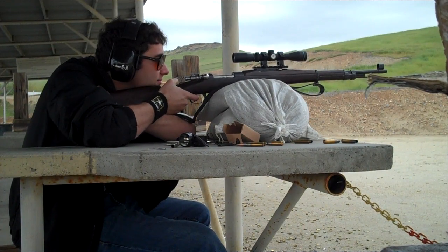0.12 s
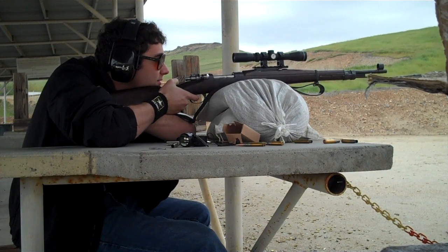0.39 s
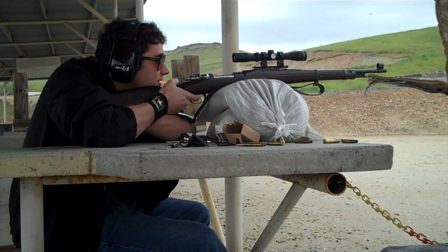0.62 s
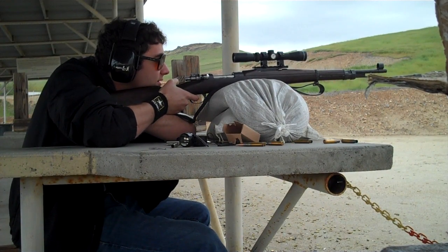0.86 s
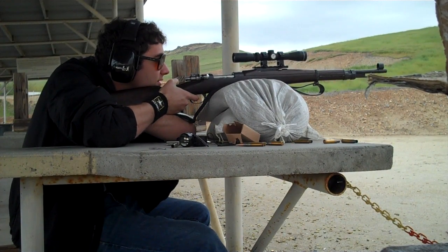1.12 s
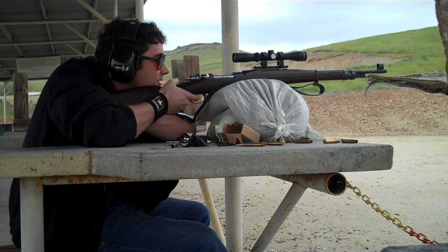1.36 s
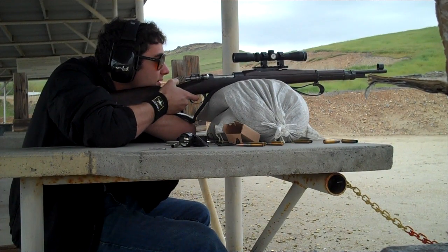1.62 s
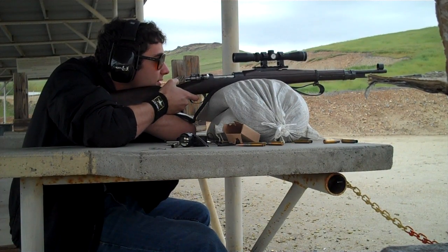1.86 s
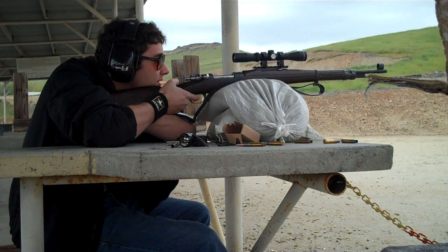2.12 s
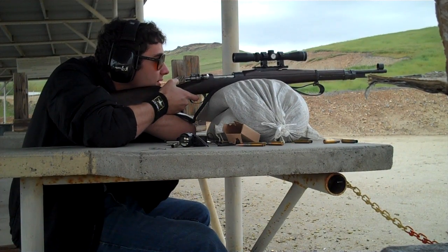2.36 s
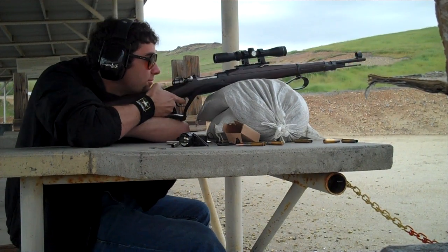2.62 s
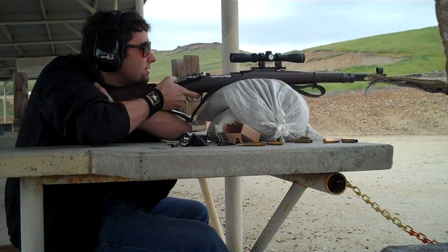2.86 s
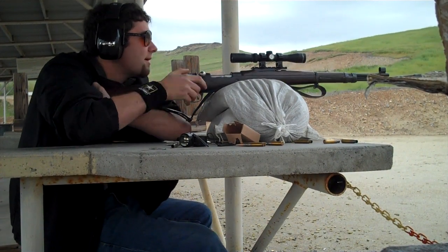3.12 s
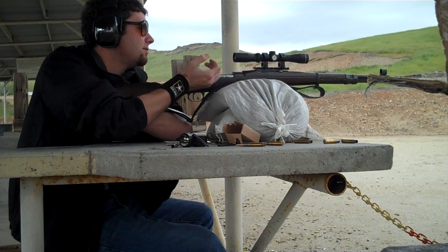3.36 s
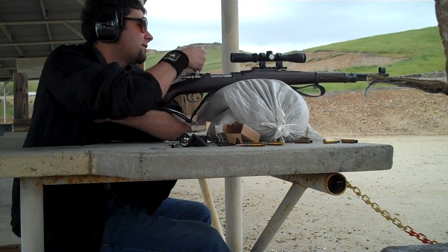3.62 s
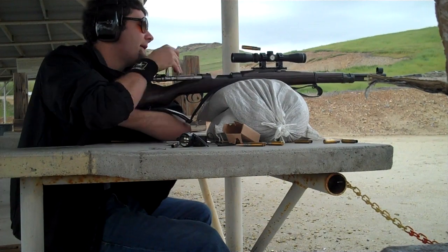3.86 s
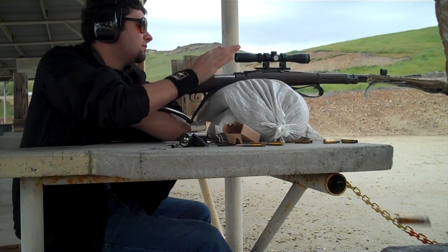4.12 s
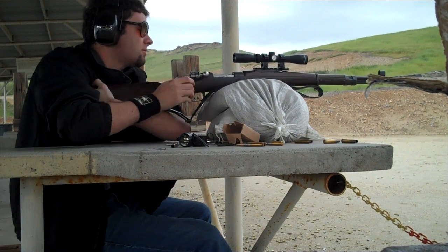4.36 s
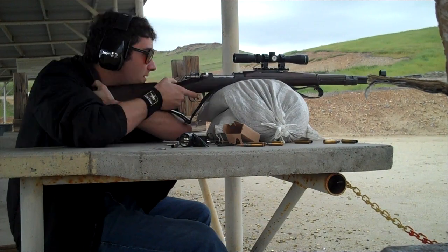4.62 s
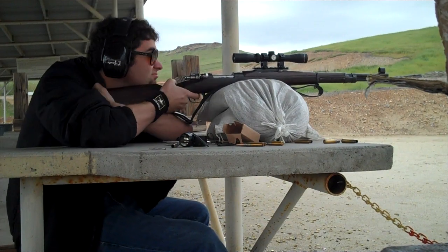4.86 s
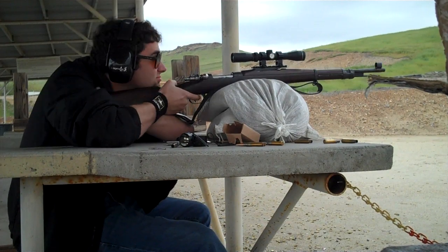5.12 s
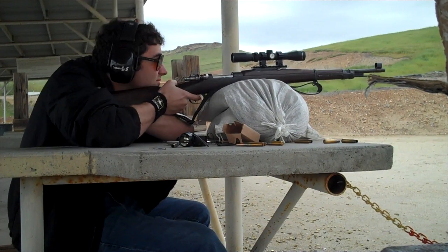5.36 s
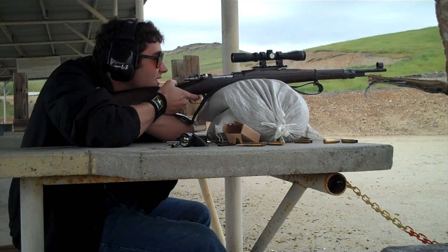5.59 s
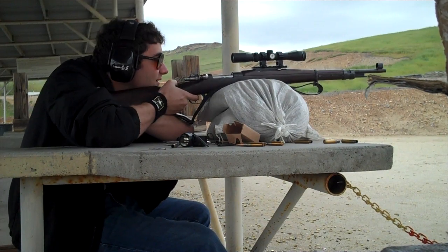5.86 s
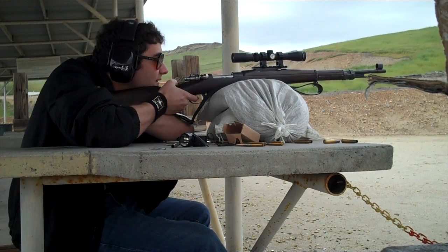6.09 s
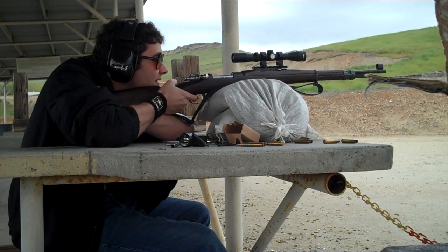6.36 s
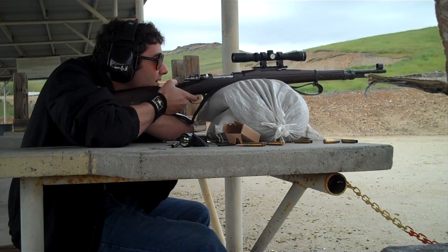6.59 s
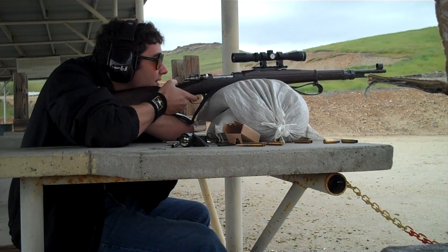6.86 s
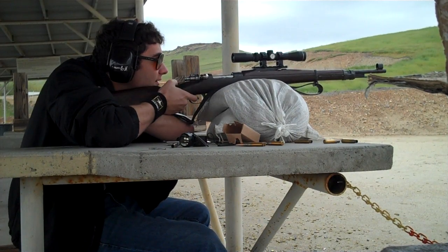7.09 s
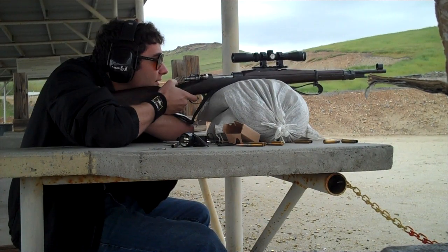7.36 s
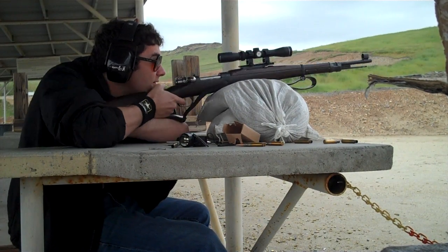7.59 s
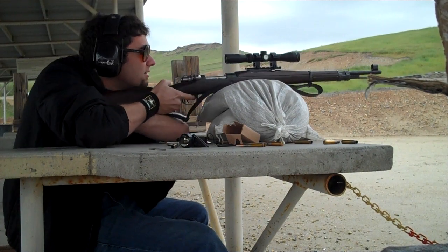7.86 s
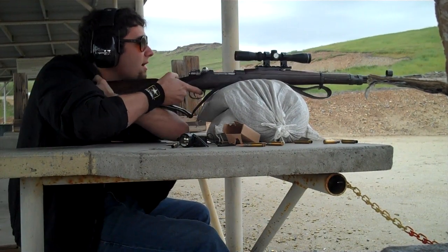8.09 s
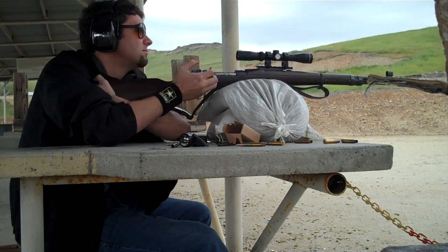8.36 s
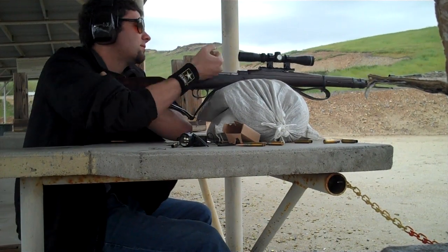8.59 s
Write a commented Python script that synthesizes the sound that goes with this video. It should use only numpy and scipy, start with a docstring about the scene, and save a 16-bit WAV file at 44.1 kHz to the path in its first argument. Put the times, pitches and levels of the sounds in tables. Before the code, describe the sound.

A rifle cracks and echoes off hills, its bolt rattles open and shut, an empty case tinkles away, then a second shot booms.

```python
"""Two rifle shots crack and boom under a sheet roof; berm, valley and hills answer in coloured noise and thuds.
Between them bursts of steel and wood noise work the bolt, and a brass case bounces with ringing twin modes.
Behind lie a noise wash, an engine's wavering partials, a pulsing thin tone and a bird's gliding whistles.
Two resonant microphone ports overload; gain control ducks all of it after loud sounds."""
import sys
import numpy as np
from scipy import signal
from scipy.io import wavfile
from scipy.ndimage import uniform_filter1d

SR = 44100
rng = np.random.default_rng(int(sys.argv[2]) if len(sys.argv) > 2 else 0)


def linear_from_db(decibels):
    """Turn decibels (scalar or array-like) into linear amplitude factors; 0 gives 1."""
    return 10 ** (np.asarray(decibels, float) / 20)


def wav_out(sig):
    """Save sig, one row per channel (or a flat mono array), as 16-bit PCM at SR to the path in sys.argv[1]."""
    wavfile.write(sys.argv[1], SR, np.round(np.clip(np.atleast_2d(sig).T, -1, 1) * 32767).astype(np.int16))


N = 384552  # samples in the scene


def read(points, hz, column=1):
    """Reads a table column at any frequency, interpolating along log frequency."""
    table = np.transpose(points)
    return np.interp(np.log(hz + 1), np.log(table[0] + 1), table[column])


def evened(x):
    """Scales a sound to rms 1."""
    return x / np.sqrt(np.mean(x ** 2) + 1e-20)


def add(mix, start_s, sound):
    """Lays a sound into the mix, cut off at the end."""
    part = mix[..., round(start_s * SR):][..., :sound.shape[-1]]
    part += sound[..., :part.shape[-1]]


def sides(lean_db):
    """Left and right gains whose levels differ by lean_db."""
    return linear_from_db(np.array([[.5], [-.5]]) * lean_db)


def noise(size, frame, same, magnitude):
    """Two partly alike channels of random short-time spectra; magnitude(hz, t) shapes them."""
    hop = frame // 4
    hz = np.fft.rfftfreq(frame, 1 / SR)[:, None]
    t = np.arange(size // hop + 5) * hop / SR
    a, b, c, d = rng.standard_normal((len(t), len(hz), 4)).T
    left, other = a + 1j * b, c + 1j * d
    like = np.clip(read(same, hz), -1, 1)
    right = like * left + np.sqrt(1 - like ** 2) * other
    spectra = np.array([left, right]) * magnitude(hz, t)
    return signal.istft(spectra, nperseg=frame, noverlap=frame - hop)[1][:, :size]


def coloured(size, frame, same, colour):
    """Steady noise of rms 1 with the spectrum of a colour table."""
    return evened(noise(size, frame, same, lambda hz, t: linear_from_db(read(colour, hz) + 0 * t)))


def wander(hz):
    """Slow irregular drift of rms 1: eight sines up to hz, the slow ones strongest."""
    t = np.arange(N) / SR
    rates = np.geomspace(0.11 * hz, hz, 8)
    return evened(sum(np.sin(2 * np.pi * (f * t + rng.random())) / np.sqrt(f) for f in rates))


# left-right likeness of close bursts, boom and replies: (frequency [Hz], correlation [-1..1])
BURST_LIKENESS = [(60, 0.2), (180, 0.27), (540, 0.3), (1610, 0.65), (4810, 0.11), (14400, 0.065)]


def knock(colour, decay_s, rise_s):
    """A burst of coloured noise, partly alike on both sides, that rises at once and dies exponentially."""
    t = np.arange(2048) / SR
    burst = coloured(len(t), 256, BURST_LIKENESS, colour)
    return burst * np.exp(-t / decay_s) * np.minimum(t / rise_s, 1)


# spectrum of the open range: (frequency [Hz], relative density [dB per Hz])
AIR_COLOUR = [(60, -11), (290, -8), (370, -7.5), (670, -16), (1400, -18), (1670, -26.5), (2340, -21.5),
              (2900, -29.5), (3500, -23.5), (4700, -30.5), (6200, -25), (7500, -30), (9000, -36.5),
              (11000, -45.5), (14200, -49.5), (15000, -79.5)]
# left-right likeness of the wash: (frequency [Hz], correlation [-1..1])
AIR_LIKENESS = [(60, 0.89), (150, 0.95), (370, 1), (930, 0.74), (2320, 0.94), (5780, -0.45), (14400, -0.24)]
# balance of the wash: (frequency [Hz], left over right [dB])
AIR_LEAN = [(60, 2.5), (240, 0.5), (930, 1), (3660, -0.5), (14400, 5)]


def air():
    """Wash of the open range: coloured noise with faint patches drifting over time and pitch."""
    def shape(hz, t):
        patches = rng.standard_normal((len(t), len(hz)))
        patches = uniform_filter1d(uniform_filter1d(patches, 12, 0), 10, 1).T
        lean_db = np.array([.5, -.5])[:, None, None] * read(AIR_LEAN, hz)
        return linear_from_db(read(AIR_COLOUR, hz) + 1.2 * evened(patches) + lean_db)
    return linear_from_db(-50) * evened(noise(N, 1024, AIR_LIKENESS, shape))


# partials of the engine: (frequency [Hz], level [dB rms])
ENGINE_PARTIALS = [(102.3, -63.5), (355.3, -54.5), (409.1, -56), (613.7, -66), (1314, -71)]


def engine():
    """Steady partials of a far engine; the wind makes their pitch and level waver."""
    warped_s = np.cumsum(1 + 0.0011 * wander(2.4)) / SR
    out = np.zeros((2, N))
    for hz, db in ENGINE_PARTIALS:
        level = np.sqrt(2) * linear_from_db(db + 0.97 * wander(3.1))
        out += level * np.sin(2 * np.pi * (hz * warped_s + rng.random()))
    return out


# pulses of the thin tone: one level [dB rms] each
WHINE_PULSES = [-66.5, -67, -70, -61]


def whine():
    """A thin 1527 Hz tone that pulses on and off a few times, its level trembling."""
    first_s, every_s, on_s, edge_s = 0.096, 0.688, 0.34, .04
    t = np.arange(N) / SR
    level = np.zeros(N)
    for k, db in enumerate(WHINE_PULSES):
        start = first_s + every_s * k
        inside_s = np.minimum(t - start, start + on_s - t)
        level += linear_from_db(db) * np.clip(inside_s / edge_s + .5, 0, 1)
    return np.sqrt(2) * level * linear_from_db(2 * wander(15.0)) * np.sin(2 * np.pi * 1527 * t)


# whistles: (middle time [s], start pitch [Hz], end pitch [Hz], length [s], level [dB])
BIRD_CHIRPS = [(1.39, 4100, 3700, .05, -61), (1.41, 4500, 4600, .06, -62), (1.526, 3440, 3810, .064, -59),
               (1.815, 4050, 3600, .045, -61), (1.85, 4500, 4620, .09, -65), (1.925, 4520, 4800, .06, -61),
               (2.03, 3400, 3450, .05, -59), (2.06, 3500, 3960, .06, -60), (2.145, 4000, 3650, .05, -61),
               (2.165, 4550, 4650, .05, -61)]


def bird():
    """Short slurred whistles, far off: gliding sines whose pitch flutters 70 times a second."""
    out = np.zeros(N)
    for middle_s, from_hz, to_hz, length_s, db in BIRD_CHIRPS:
        hz = np.linspace(from_hz, to_hz, round(length_s * SR))
        hz *= 1 + 0.042 * np.sin(2 * np.pi * 70 * np.arange(len(hz)) / SR)
        whistle = np.hanning(len(hz)) * np.sin(2 * np.pi * np.cumsum(hz) / SR)
        add(out, middle_s - length_s / 2, linear_from_db(db) * whistle)
    return out


# spectrum of the woody tap: (frequency [Hz], relative density [dB per Hz])
TAP_COLOUR = [(410, -45), (700, -13), (1480, -14.5), (2460, 2.5), (3350, -11.5), (3680, -14), (6500, -14),
              (8450, -48.5), (14300, -120)]


def tap():
    """A single dry knock on wood: one noise burst with a 2.5 ms decay."""
    out = np.zeros((2, N))
    add(out, 4.5409, linear_from_db(-20) * knock(TAP_COLOUR, 0.0025, .0008))
    return out


# spectrum of steel on steel, also for the bolt and striker: (frequency [Hz], relative density [dB per Hz])
STEEL_COLOUR = [(1180, -41.5), (2000, -26), (2840, -12.5), (3280, -12), (6210, -0.5), (6750, -9),
                (7590, -2.5), (9930, -14.5), (13700, -24), (14800, -37.5)]
# strokes of the bolt in its track: (start time [s], end time [s], level [dB])
SLIDE_STROKES = [(3.653, 3.67, -38.5), (3.7, 3.78, -49.5), (3.799, 3.837, -27.5), (3.87, 3.97, -44),
                 (4.004, 4.004, -30), (4.054, 4.13, -31), (4.18, 4.294, -41)]


def slide():
    """Dense grit of tiny steel clicks, swelling in and out with each stroke of the bolt."""
    rise, fall = 830, 330  # dB per s
    t = np.arange(N) / SR
    strokes_db = [db - rise * np.maximum(start - t, 0) - fall * np.maximum(t - end, 0)
                  for start, end, db in SLIDE_STROKES]
    grit = linear_from_db(4.0 * rng.exponential(1, N).clip(0, 4))
    grit *= rng.random(N) < 2500 / SR  # about 2500 clicks per second
    click = knock(STEEL_COLOUR, 0.00091, 0.00012)
    rub = evened(signal.fftconvolve(grit[None], click, axes=1)[:, :N])
    return rub * linear_from_db(np.max(strokes_db, 0)) * sides(5)


# the case lands base first, then mouth:
# (base time [s], mouth time [s], base tick level [dB], ring drive from base [dB], ring drive from mouth [dB])
CASE_BOUNCES = [(3.8344, 3.8344, -29.5, -28.5, -68), (4.4132, 4.4256, -23, -18, -68),
                (4.7401, 4.7532, -37, -40, -33.5), (4.8444, 4.8444, -50, -41.5, -65),
                (4.9538, 4.9701, -41.5, -54, -48.5), (5.1365, 5.155, -42.5, -44, -50.5),
                (5.2304, 5.248, -46, -49, -48.5), (5.2905, 5.3128, -47.5, -51, -54.5),
                (5.3818, 5.4044, -55.5, -58, -54), (5.4234, 5.4234, -59, -58, -69),
                (5.5, 5.5, -65, -64.5, -70), (5.62, 5.62, -68.5, -86, -69), (5.7, 5.7, -70, -86.5, -70)]
# twin modes of the brass: (lower frequency [Hz], upper frequency [Hz], waves round the rim [count])
CASE_MODES = [(7962, 8123, 1), (10220, 10450, 3), (11690, 11770, 2)]
# 60 dB decay of the low, middle and high ring: one time [s] each
CASE_DECAYS = [0.47, 0.44, 0.26]
# how each end of the case drives the low, middle and high ring: one level [dB] each
BASE_DRIVE, MOUTH_DRIVE = [-44, -46.5, -1.5], [0, -6, -5]
# the case turns as it tumbles: (time [s], place hit on the rim [deg])
CASE_SPOTS = [(3.83, 8), (4.4, 25), (4.74, 5), (4.9, 11), (4.97, 31), (5.13, 85)]
# spectrum of a tick, also for the bullet strike: (frequency [Hz], relative density [dB per Hz])
TICK_COLOUR = [(470, -20.5), (800, -37), (1560, -14.5), (1990, -19), (4040, -11.5), (5780, -5.5),
               (7600, -10.5), (9880, -31), (16700, -120)]
# brightness added by hard knocks: (frequency [Hz], relative density [dB per Hz])
SNAP_COLOUR = [(900, -25), (3000, -19.5), (8000, 0), (12000, -6), (15000, -22.5)]


def case():
    """Knocks tick, skid and add to the ring; the spot hit sets the mix of twin modes; spinning makes it flutter."""
    rings, ticks, t = np.zeros((3, N)), np.zeros((2, N)), np.arange(SR) / SR
    low_hz, high_hz, waves = np.transpose(CASE_MODES)[..., None]
    low_twin, high_twin = np.sin(2 * np.pi * low_hz * t), np.sin(2 * np.pi * high_hz * t)
    dying_db = -60 * t / np.array(CASE_DECAYS)[:, None]
    for base_s, mouth_s, db, base_db, mouth_db in CASE_BOUNCES:
        base = base_s, db, base_db + np.array(BASE_DRIVE)
        mouth = mouth_s, db + 0.5, mouth_db + np.array(MOUTH_DRIVE)
        for at, tick_db, ring_db in [base, mouth]:
            turn = waves * np.radians(np.interp(at, *np.transpose(CASE_SPOTS)))
            twins = np.cos(turn) * high_twin + np.sin(turn) * low_twin
            add(rings, at, linear_from_db(ring_db[:, None] + dying_db) * np.minimum(t / 0.0012, 1) * twins)
            tick = knock(TICK_COLOUR, 0.0025, .0006)
            snap = linear_from_db(0.43 * (tick_db + 36)) * knock(SNAP_COLOUR, .002, 0.00047)  # grows with the knock
            skid = linear_from_db(-11) * knock(TICK_COLOUR, 0.022, 0.0087)
            add(ticks, at, linear_from_db(tick_db) * (tick + snap + skid))
    fluttering = sum(ring * linear_from_db(3.05 * wander(120.)) for ring in rings)
    return sides(18.2) * fluttering + sides(24) * ticks


# stops of the bolt: (time [s], level [dB], left over right [dB], wooden body against the steel [dB])
BOLT_STOPS = [(3.604, -41, 9, -15), (3.6358, -25, 1.5, -13), (3.6551, -12.5, 1, -15),
              (3.6659, -18, -4, -28), (3.74, -21, 1.5, -13.5), (3.7684, -31.5, -0.5, -3),
              (3.7936, -8.5, 1.5, -12.5), (3.8185, 3, 1.5, -19), (3.9924, -16.5, 5, -16.5),
              (4.0024, -21, -2.5, -19.5), (4.0127, -15, -4, -16.5), (4.0424, -11, 7, -18.5),
              (4.0511, -3, 4, -21.5), (4.0574, -12.5, -4.5, -19), (4.0752, -13.5, 0, -16),
              (4.0921, -4.5, 8, -19), (4.1102, 1.5, 3.5, -14.5), (4.1184, -5.5, 4.5, -28),
              (4.1334, -20, 7, -26.5), (4.2292, -5, 2, -11.5), (8.6811, -43.5, 1, -5)]
# spectrum of the wooden stock: (frequency [Hz], relative density [dB per Hz])
STOCK_COLOUR = [(150, -41), (250, -9.5), (1210, -6.5), (2750, -3.5), (3500, -9), (4550, -37), (7700, -120)]


def bolt():
    """Each stop of the bolt is a dense rattle of steel with more or less of the wooden stock under it."""
    out = np.zeros((2, N))
    for s, db, lean_db, body_db in BOLT_STOPS:
        decay_s = 0.0028 / (1 + 0.5 * linear_from_db(body_db))  # the more wood, the shorter
        steel = knock(STEEL_COLOUR, decay_s, .001)
        wood = linear_from_db(body_db) * knock(STOCK_COLOUR, 3.5 * decay_s, 0.00094)  # wood outlasts steel
        add(out, s, linear_from_db(db) * sides(lean_db) * (steel + wood))
    return out


# decay under the roof: (frequency [Hz], time to fall 60 dB [s])
SHELTER_DECAY = [(500, 0.61), (2000, 0.305), (5000, 0.39), (9000, 0.3), (14000, 0.029)]


def shelter(x):
    """The roof throws a small sound back after 9 ms, then a short tail; the paths change as things move."""
    def reflection(hz, t):
        first_db = 12.6 * (abs(t - .0095) < .0015)
        return linear_from_db(-60 * t / read(SHELTER_DECAY, hz) + first_db) * (t > .0075)

    out, source = x.copy(), 0.385 * x + 0.433 * x[::-1]
    t = np.arange(N) / SR
    for k in range(3):
        tail = noise(SR // 2, 128, [(100, 1.0), (9000, 0.29)], reflection)
        tail *= linear_from_db(-3) / np.linalg.norm(tail[0])
        share = np.sqrt(2 / 3) * np.cos(np.pi * (6.5 * t + k / 3))  # squares of the three sum to 1
        out += signal.fftconvolve(source * share, tail, axes=1)[:, :N]
    return out


# shots: (time [s], blast level [dB], bullet strike level [dB], berm echo level [dB])
RIFLE_SHOTS = [(2.5781, 3, -27, -25.5), (7.618, 3, -21, -37.5)]
# spectrum of the blast: (frequency [Hz], relative density [dB per Hz])
BLAST_COLOUR = [(15, -55), (25, -24), (142, -14.5), (171, -7.5), (308, -17.5), (362, 4), (414, -18),
                (473, -4.5), (1030, -15), (1380, -16.5), (7410, -23), (13700, -36), (14800, -52.5)]
# shelter after a shot: (frequency [Hz], build-up [s], time to fall 60 dB [s])
BOOM_TIMES = [(40, 0.039, 0.23), (118.7, 0.093, 0.18), (177, 0.13, 0.5), (400, 0.14, .4),
              (991.4, 0.099, 0.37), (2973, 0.04, 0.35), (6000, 0.0022, 0.38), (12000, 0.0048, .25)]
# notes of the roof sheets: (frequency [Hz], level [dB against the blast], loudest after the shot [s], spread [s])
ROOF_NOTES = [(117.3, -18.5, 0.088, 0.076), (175.5, -14, .13, 0.083), (238.1, -13.5, .11, .077),
              (295.3, -17, 0.14, .1), (360.6, -2.5, .1, .035), (473, -14, .13, .081)]
# spectrum of the berm echo: (frequency [Hz], relative density [dB per Hz])
ECHO_COLOUR = [(180, -31.5), (300, 1.5), (378, -16), (435, -6.5), (926, -7), (1200, -14), (7550, -12.5),
               (12000, -44), (15600, -68.5), (22000, -120)]
# spectrum of the valley rumbling on: (frequency [Hz], relative density [dB per Hz])
VALLEY_COLOUR = [(59, -29), (100, -13), (312, -5.5), (674, -30.5), (833, -20), (1090, -21), (6670, -27.5),
                 (10000, -44.5), (13000, -86.5), (22000, -120)]
# low echoes off the hills: (delay after the shot [s], level [dB], frequency [Hz])
HILL_THUDS = [(.535, -28, 260), (.685, -33, 150)]


def shots():
    """The blast fills the shelter, treble at once and bass late; the roof sheets boom; bank and hills reply."""
    out, t = np.zeros((2, N)), np.arange(SR) / SR

    def boom(hz, t):
        # the long roof keeps feeding sound back before the decay sets in
        dying = np.sqrt(t ** 2 + 0.1 ** 2) - .09
        build_up = 1 - np.exp(-(t + 0.011) / read(BOOM_TIMES, hz))
        return linear_from_db(read(BLAST_COLOUR, hz) - 60 * dying / read(BOOM_TIMES, hz, column=2)) * build_up

    def reply(colour, t60, rise_s):
        sound = coloured(SR, 256, BURST_LIKENESS, colour)
        return sound * linear_from_db(-60 * t / t60) * np.minimum(t / rise_s, 1)

    for s, blast_db, strike_db, echo_db in RIFLE_SHOTS:
        field = noise(SR, 1024, BURST_LIKENESS, boom)
        field *= np.minimum(t / 0.0021, 1) / np.sqrt(np.mean(field[:, :SR // 10] ** 2))
        for hz, db, loudest, spread in ROOF_NOTES:
            swell = linear_from_db(db) * np.exp(-((t - loudest) / spread) ** 2) * np.minimum(t / 0.0057, 1)
            phase = rng.random() + .07 * rng.standard_normal((2, 1))  # slightly apart left and right
            field += swell * np.sin(2 * np.pi * (hz * t + phase))
        add(out, s, linear_from_db(blast_db) * field)
        add(out, s - .004, linear_from_db(-21.0) * reply(STEEL_COLOUR, .04, .003))  # the striker falls just before
        add(out, s + .403, linear_from_db(strike_db) * reply(TICK_COLOUR, 0.02, .0005))  # the bullet strikes
        add(out, s + .465, linear_from_db(echo_db) * reply(ECHO_COLOUR, 0.3, 0.0043))  # the berm answers
        # the valley answers in lumps, slope by slope
        lumps = evened(uniform_filter1d(uniform_filter1d(rng.standard_normal(SR), 700), 700))
        fade = np.hanning(2 * SR)[SR:] ** 0.33
        add(out, s + 0.1, linear_from_db(-25.5 + 1.73 * lumps) * reply(VALLEY_COLOUR, 2.07, 0.12) * fade)
        for delay, db, hz in HILL_THUDS:
            turns = np.arange(0, 3.5, hz / SR)
            add(out, s + delay, linear_from_db(db) * np.hanning(len(turns)) * np.sin(2 * np.pi * turns))
    return out


def scene():
    """Sums the far background, the small sounds under the roof and the shots."""
    far = air() + engine() + whine()
    far[1] = np.roll(far[1], 5)  # samples: from the left, it reaches the right port last
    small = bird() + tap() + slide() + case() + bolt()
    return far + shelter(small) + shots()


def roll_off(x):
    """The treble ends steeply here."""
    return signal.sosfilt(signal.butter(12, 15000, fs=SR, output="sos"), x)


def resonate(x, peaks):
    """A sum of two-pole resonances."""
    return sum(linear_from_db(db) * signal.lfilter(*signal.iirpeak(hz, hz / max(width, 20), SR), x)
               for hz, width, db in peaks)


# left, then right microphone cavity: (frequency [Hz], width [Hz], level [dB])
PORT_PEAKS = [(7430, 630, 5.5), (6370, 1000, -3.5)]
# hiss and rumble of the ports: (frequency [Hz], relative density [dB per Hz])
RUMBLE_COLOUR = [(15, -3), (40, 0), (120, -0.5), (300, -11.5), (700, -34), (3000, -45), (9000, -48),
                 (12000, -89.5)]
# low rumble of overload: (frequency [Hz], relative density [dB per Hz])
OVERLOAD_COLOUR = [(15, -9), (30, 1), (70, .5), (120, -5), (170, -30), (400, -70)]


def record(dry):
    """Ports resonate, gain control ducks and slowly recovers, rumble joins, more of it in overload, peaks clip."""
    heard = np.array([x + resonate(x, [port]) for x, port in zip(dry, PORT_PEAKS)])
    power = (heard ** 2).mean(0)
    power_db = 10 * np.log10(abs(uniform_filter1d(power, 400)) + 1e-12)
    fall = np.arange(N) * 28. / SR  # the held peak sinks 28 dB per s
    held_db = np.maximum.accumulate(power_db + fall) - fall
    cut_db = np.clip(0.37 * (held_db + 38.0), 0, 10)
    pole = np.exp(-1 / (0.038 * SR))  # the gain glides over 38 ms
    ducked = heard / linear_from_db(signal.lfilter([1 - pole], [1, -pole], cut_db))
    ducked += linear_from_db(-60) * coloured(N, 2048, [(20, 0.56), (200, 1.0)], RUMBLE_COLOUR)
    # overload, averaged over the 27 ms before, adds a low rumble, unlike left and right
    held_power = uniform_filter1d(power, 1200, origin=599)
    overload_db = 10 * np.log10(abs(held_power) + 1e-12) + 2
    overload_rumble = coloured(N, 2048, [(20, .05), (200, 0.45)], OVERLOAD_COLOUR)
    ducked += linear_from_db(-22) * overload_rumble * np.clip(overload_db / 3, 0, 1)
    return roll_off(np.clip(ducked, -0.98, 0.98))


dry = scene()
out = record(dry)
wav_out(out)
```